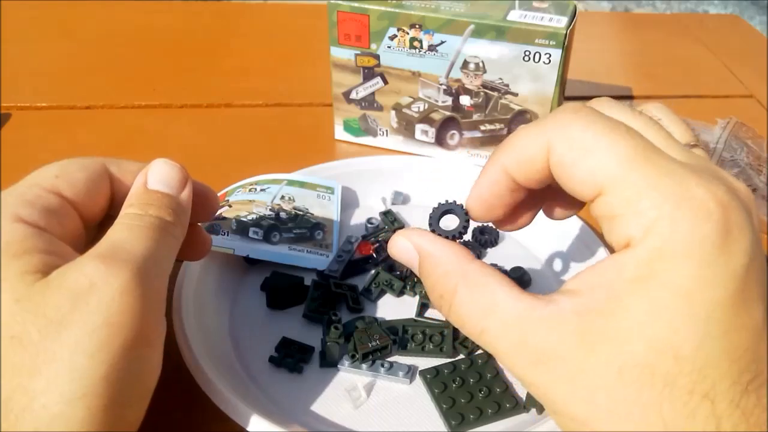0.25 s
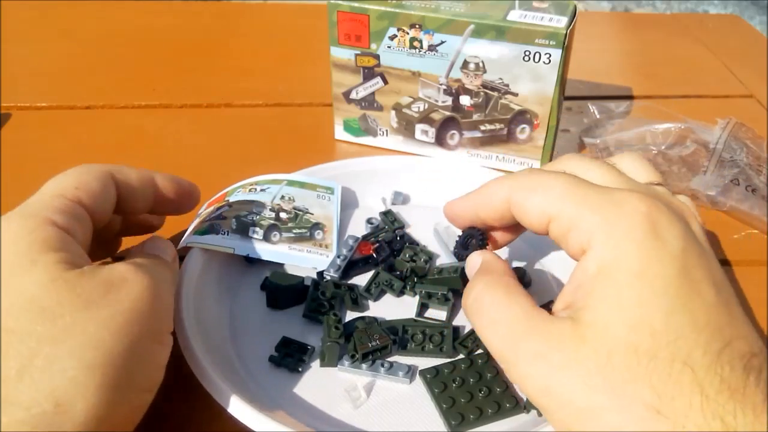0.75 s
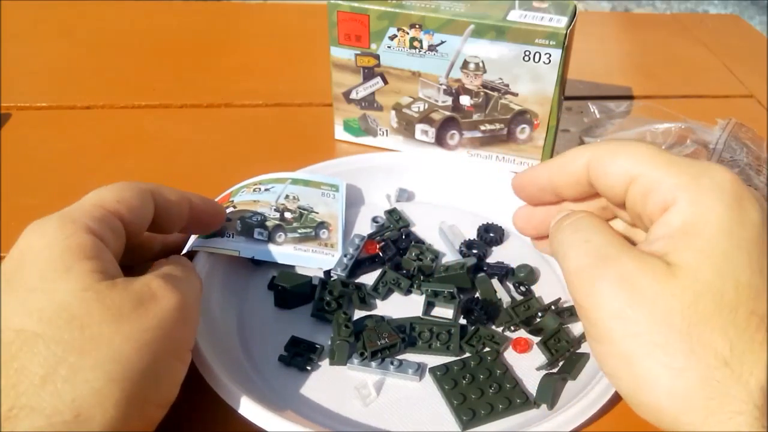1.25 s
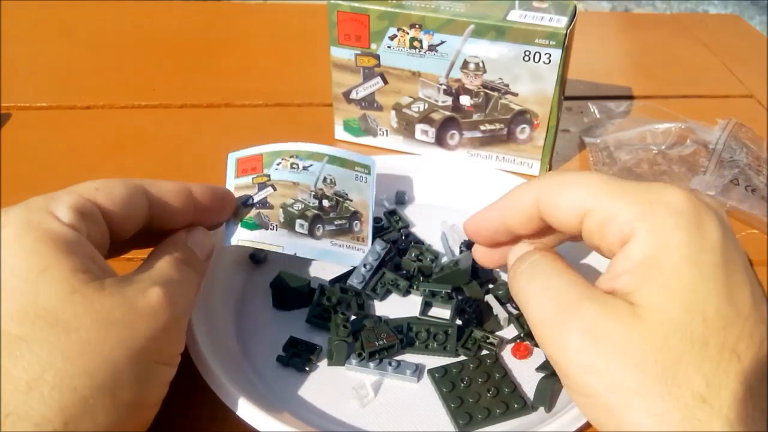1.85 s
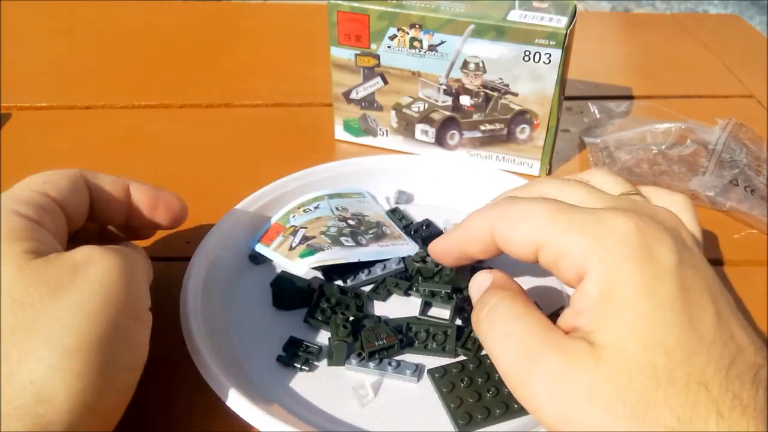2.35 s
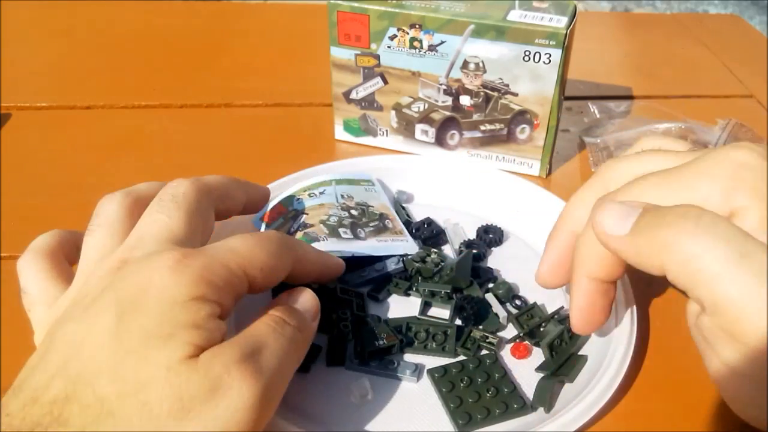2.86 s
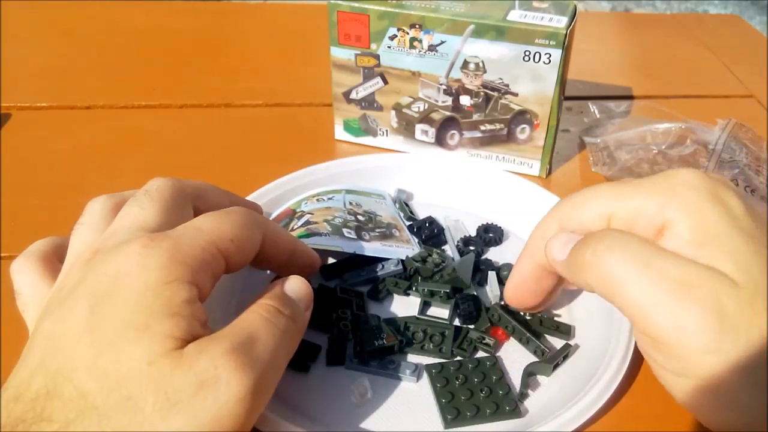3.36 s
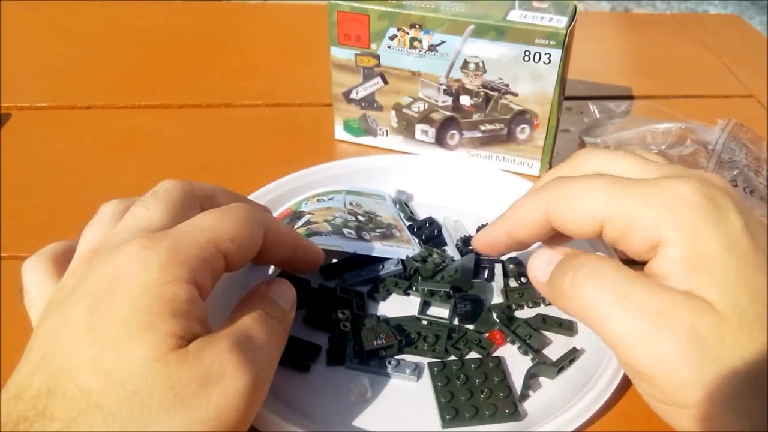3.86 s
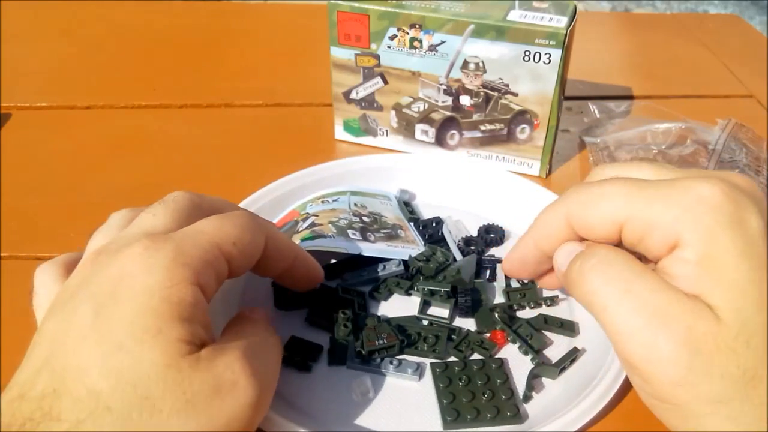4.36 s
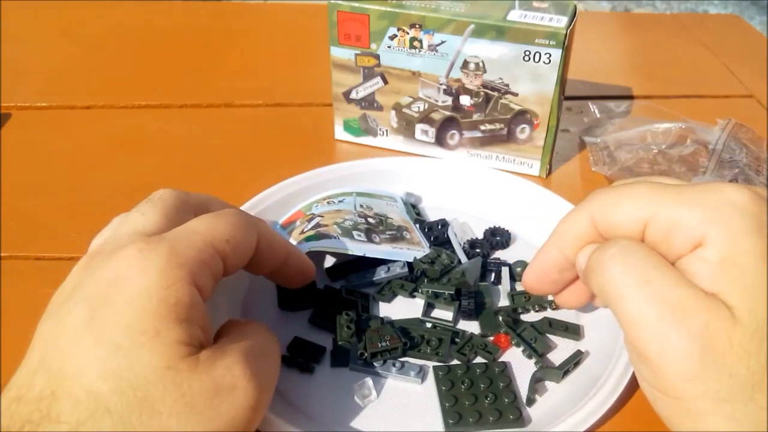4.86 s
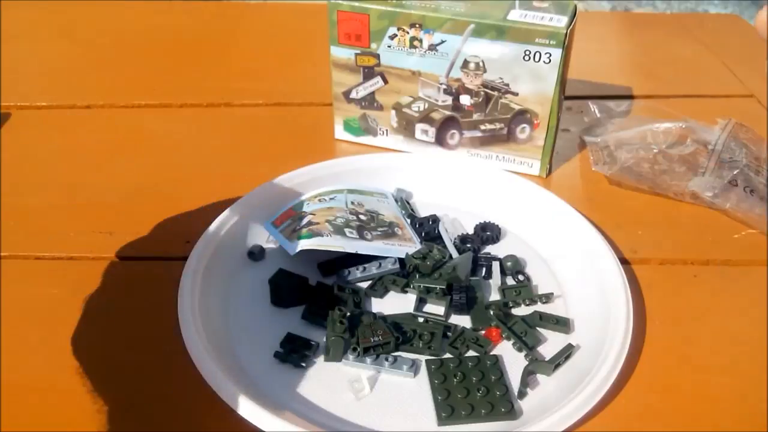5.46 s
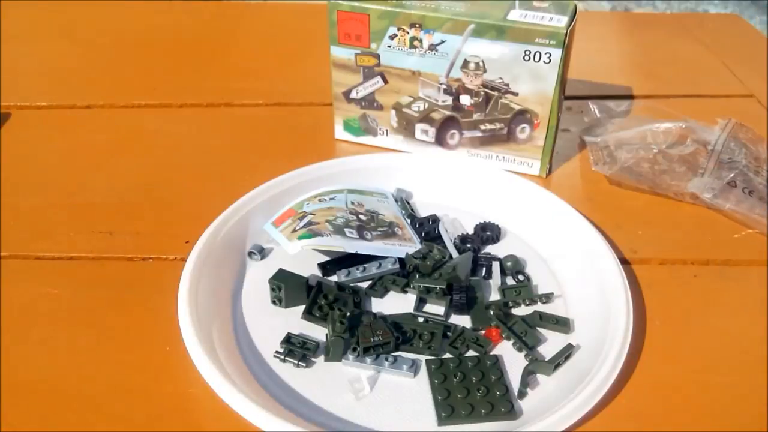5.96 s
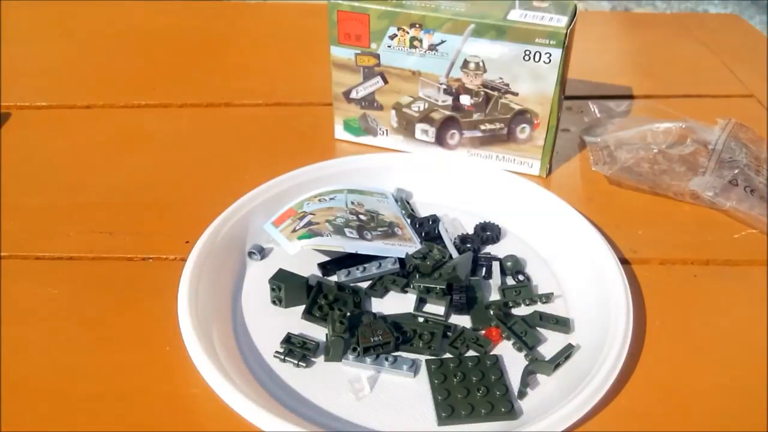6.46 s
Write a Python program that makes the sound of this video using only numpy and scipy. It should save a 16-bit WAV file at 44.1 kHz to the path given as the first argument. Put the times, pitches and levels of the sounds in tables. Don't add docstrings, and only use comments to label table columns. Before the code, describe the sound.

A faint steady hiss and soft, low knocks of wrists on a table fill the first second. At about 1.0 s fingers begin stirring small plastic bricks on a thin plastic plate: faint ticks, then a crisp rattle around 1.2 s. Lighter shuffling follows from 1.6 to 2.1 s, then a dense, bright clatter with sharp snaps from 2.2 to 2.5 s. After a near pause, rummaging resumes at 3.0 s, with strong bursts near 3.4, 3.6 and 3.8 to 3.95 s and tiny ringing pings. Smaller clicks come around 4.0 to 4.4 s, then only sparse, weak ticks until 5.5 s. At about 5.7 s there is a firmer low bump and a very faint, short scuff of the plate on wood. Low muffled knocks continue over the hiss to the end at about 6.7 s. Very close, dry, band-limited stereo sound.

```python
import sys
import numpy as np
from scipy import signal
from scipy.fft import rfft, irfft
from scipy.io import wavfile
from scipy.ndimage import uniform_filter1d

SR = 44100
rng = np.random.default_rng(int(sys.argv[2]) if len(sys.argv) > 2 else 0)


def materialize(psi):
    bounded = np.clip(np.atleast_2d(psi).T, -1, 1)
    quanta = np.round(bounded * 32767).astype(np.int16)
    wavfile.write(sys.argv[1], SR, quanta)


def gain_from_db(level_db):
    decades = np.asarray(level_db, float) / 20
    return 10 ** decades


N = 296352

# (frequency [Hz], level [dB per Hz])
HISS_COLOUR = [(12, -8.5), (20, -8), (27, -2), (202, -21), (240, -11), (340, -14.5), (447, -18), (853, -23),
               (919, -24), (2000, -23.5), (4190, -18.5), (6000, -21), (7600, -26), (9880, -77),
               (16700, -120)]
HISS_DB = -57.5
# (frequency [Hz], likeness [-1 to 1])
HISS_LIKENESS = [(60, .8), (160, 0.48), (430, 0.35), (1140, 0.17), (2500, 0.13), (4500, 0.59), (8130, 0.89)]
# (frequency [Hz], lead [rad])
HISS_LEFT_LEAD = [(130, 1.64), (220, 4.88), (420, 2.75), (1000, 3.1)]
# (time [s], low rumble [dB], hiss swell [dB])
UNREST_CURVE = [
    (0.0, -52, 2),
    (0.241, -58, 0.5),
    (2.02, -57.5, 1.5),
    (5.3, -56.5, 0.5),
    (6.4, -54, 2.5),
    (6.5, -53, 1.5),
    (6.72, -54, 1),
]

# (time [s], peak [dB], swing [Hz])
SINGLE_KNOCKS = [(0.129, -46, 89), (0.196, -43, 68.4), (0.463, -46.5, 107), (1.043, -39, 115),
                 (1.21, -42.5, 119), (1.26, -45, 96), (1.832, -38, 95), (2.008, -37, 90),
                 (2.035, -45.5, 95), (2.264, -54, 190), (2.328, -42, 132), (2.432, -36, 202),
                 (2.451, -45, 219), (2.949, -41, 146), (3.324, -34.5, 99.5), (3.343, -31, 144),
                 (4.329, -47, 96), (4.358, -38.5, 105), (4.465, -46.5, 89.5), (4.676, -34, 112),
                 (4.869, -45, 72), (5.197, -42.5, 116), (5.257, -46, 83.5), (5.38, -35, 104),
                 (5.625, -46, 84), (5.869, -43, 84), (6.009, -42.5, 83), (6.218, -33, 105),
                 (6.235, -34.5, 104), (6.419, -31, 112)]
# (time [s], peak [dB], swing [Hz], second contact relative [dB])
DOUBLE_KNOCKS = [(0.014, -36, 90, -21), (0.663, -39, 93, -21), (1.021, -47, 111, 9),
                 (1.979, -44.5, 89, 5.5), (2.913, -40.5, 107, -4.5), (2.962, -38, 111, -15),
                 (3.291, -45, 121, 5), (3.351, -35, 99, 0), (3.386, -37, 99, -23), (3.413, -39, 118, -12),
                 (4.053, -44, 115, -1), (4.189, -41.5, 90, -14), (4.235, -48, 145, 17),
                 (4.695, -39.5, 99, -23), (5.455, -45.5, 82.5, -3), (5.707, -44.5, 113, 8),
                 (5.736, -28.5, 123, -19), (5.849, -43.5, 100, -14), (6.255, -36, 106, -3.5),
                 (6.295, -32, 101, -16), (6.367, -37.5, 100, -12), (6.393, -45, 95, -20)]
BOUNCE_S, BOUNCE_SAG = 0.01285, 0.8
# (time [s], peak [dB])
SOFT_NUDGES = [(0.986, -54), (1.293, -48.5), (1.956, -46.5), (2.748, -51), (3.451, -48), (4.488, -52),
               (4.738, -50), (4.769, -51.5), (5.169, -49), (5.32, -50), (5.414, -48), (5.784, -51),
               (5.914, -46.5), (6.064, -55), (5.232, -50), (5.288, -53), (5.472, -46.5), (6.6, -53),
               (6.69, -54), (2.8, -56), (3.159, -51)]
NUDGE_HZ = 95

# (time [s], level [dB], relative plate flex [dB])
SLIDING_STIRS = [
    [(0.93, -81, 17.5), (1.18, -40, 10.5), (1.3, -73, -33)],
    [(1.54, -49.5, 16), (1.7, -43, 7), (1.796, -44, 2.5), (1.86, -60, 11)],
    [(1.87, -45, -14), (2.016, -55, 13.5), (2.08, -57, 3)],
    [(2.1, -59.5, 8), (2.366, -34, 4), (2.555, -71, 9.5)],
    [(3.0, -47, 8), (3.224, -54, 6), (3.24, -61, -9)],
    [(3.25, -35, 5), (3.47, -62, 0)],
    [(3.545, -42.5, 6), (3.67, -67, 2)],
    [(3.705, -48, -30), (3.791, -35.5, 8.5), (3.855, -53, -3)],
    [(3.89, -40, 12), (4.008, -66, -10), (4.08, -81, -18)],
    [(4.176, -45, 13), (4.46, -58, -11)],
    [(4.65, -59.5, 18.5), (4.886, -53, 1.5), (4.93, -76, 0)],
    [(5.0, -67, 0), (5.382, -53.5, -1), (5.6, -64, 16)],
]
# (peak time [s], level [dB], spread [ms], pitch [Hz])
TUMBLE_BURSTS = [(0.988, -53, 9, 3800), (1.039, -52.5, 28, 3780), (1.136, -31, 4.5, 4630),
                 (1.196, -30, 9.1, 4800), (1.246, -38, 7.5, 5150), (1.639, -31, 5.9, 4600),
                 (1.673, -33.5, 10, 4530), (1.748, -34.5, 4.5, 3960), (2.118, -45, 6.5, 5450),
                 (2.133, -40.5, 2.2, 5200), (2.189, -38, 3.4, 4960), (2.217, -36, 4.9, 5030),
                 (2.226, -33, 11, 4720), (2.249, -29.5, 3.1, 4970), (2.347, -24.5, 0.96, 4300),
                 (2.461, -28.5, 11, 4030), (3.154, -47, 12, 5220), (3.35, -31.5, 2, 4500),
                 (3.379, -23, 11.6, 4800), (3.408, -26.5, 7.6, 4940), (3.44, -30.5, 2, 4150),
                 (3.564, -40, 4.2, 4400), (3.606, -25.5, 4.1, 5060), (3.625, -36, 7, 4800),
                 (3.774, -21.5, 4.3, 4760), (3.908, -33.5, 2.5, 5580), (3.927, -30.5, 3.2, 4670),
                 (3.948, -34, 7.3, 4600), (4.296, -33, 5.8, 5050), (4.86, -43, 5.6, 3770)]
# (peak time [s], level [dB], die-away [ms], pitch [Hz])
SPILL_BURSTS = [(1.172, -28.5, 12, 4900), (1.234, -40, 9.2, 4460), (5.216, -52, 10, 4130),
                (1.588, -48, 31, 5400), (1.614, -44, 45, 5450), (1.929, -33.5, 1.7, 4600),
                (1.952, -48, 2.9, 4530), (1.995, -43, 3.2, 4970), (2.262, -24, 7.6, 4750),
                (2.433, -26.5, 6, 4160), (2.502, -33, 7.2, 4000), (3.01, -36, 17, 4600),
                (3.038, -31, 3.7, 4300), (3.25, -41, 1.2, 3960), (3.262, -40.5, 11, 4430),
                (3.359, -26.5, 8.5, 4600), (3.489, -44.5, 7.6, 4270), (3.654, -49, 2.3, 4800),
                (3.732, -34, 4.3, 4180), (3.894, -52, 5, 5100), (4.029, -36, 3.9, 5550),
                (4.179, -37.5, 6.6, 4330), (4.27, -44, 50, 4240), (4.77, -52, 49, 4600),
                (4.67, -62, 30, 3600), (4.9, -47.5, 1.7, 4400), (5.197, -48.5, 16, 3940),
                (5.24, -51, 27, 4540), (5.453, -49, 2.6, 5000)]
# (jam time [s], level [dB], build-up [ms], pitch [Hz])
SHOVE_BURSTS = [(1.224, -35, 8.2, 4760), (1.735, -36, 23, 5450), (1.808, -39, 11, 3820),
                (1.821, -35, 4.2, 4120), (1.852, -46.5, 49, 4420), (1.965, -39.5, 2.9, 4940),
                (2.034, -51, 6.5, 4780), (2.293, -33.5, 17, 4950), (2.32, -27.5, 15, 4260),
                (2.37, -31.5, 10, 4140), (2.388, -37, 6.8, 4680), (2.445, -26, 7.9, 4370),
                (2.748, -52.5, 18, 3930), (3.073, -38, 21, 3950), (3.208, -40.5, 8.4, 4450),
                (3.224, -39, 14, 4830), (3.285, -29.5, 7.4, 4400), (3.317, -38, 11, 4150),
                (3.593, -39.5, 13, 4600), (3.8, -34, 6.7, 4600), (3.965, -34, 6.7, 4460),
                (4.04, -39.5, 4.2, 4430), (4.057, -47, 8.1, 4600), (4.244, -42, 28, 4070),
                (4.361, -49.5, 52, 4800), (4.394, -43.5, 7.2, 4500), (5.037, -56.5, 46, 4430),
                (5.279, -49, 28, 4240), (5.364, -46, 31, 4530), (5.417, -41.5, 14, 4300)]
STRIKE_MS, JAM_MS, SWELL = 1.1, 3.7, 0.87

# (frequency [Hz], level [dB per Hz])
CLATTER_COLOUR = [(88, -38), (150, -4.5), (304, -3.5), (474, -21), (680, -15), (960, -11.5), (1450, -26),
                  (1680, -24), (1900, -5), (2150, -3), (2930, -7), (4140, -1.5), (5300, -1), (6200, -4.5),
                  (7120, -10.5), (7600, -30), (9880, -50), (16700, -120)]
# (frequency [Hz], level [dB], t60 [s])
BRICK_TONES = [(2195, 9.5, 0.016), (2860, 2, 0.091), (4430, -4, 0.05), (4600, -9, .025),
               (5800, -6.5, 0.041), (5700, -12.5, 0.06)]
# (frequency [Hz], t60 [s])
PLATE_T60 = [(200, 0.16), (1000, 0.1), (2200, 0.054), (5000, 0.033), (8000, 0.0055)]
# (frequency [Hz], likeness [-1 to 1])
TICK_LIKENESS = [(200, 1), (350, 0.77), (520, -0.64), (1000, 1), (2300, 0.91), (3500, 0.32), (7000, -0.75)]
TICKS_PER_S, TICK_SPREAD_DB, MODES_DB, HEAP_DB = 4000, 2, -12.5, -1.5
CRACK_DB, CRACK_T60 = 6, 0.0098

# (time [s], level [dB], pitch [Hz])
EARLY_SNAPS = [(0.9838, -52, 3810), (1.1046, -51, 4090), (1.137, -35.5, 4970), (1.2631, -41, 4480),
               (1.59, -39, 5420), (1.6512, -37, 5200), (1.677, -28, 4070), (1.685, -34, 4320),
               (1.7207, -39, 4370), (1.726, -41, 4200), (1.7474, -32, 3010), (1.8074, -41, 3900),
               (1.822, -36, 4220), (1.855, -44.5, 4360), (1.917, -42, 4250), (1.9285, -43, 4630),
               (1.9519, -47, 4510), (1.963, -37.5, 4460), (1.9673, -38, 4800), (1.9935, -48, 5140),
               (1.996, -48, 4480), (2.013, -46.5, 4330), (2.0364, -38.5, 4250), (2.0713, -46, 4660),
               (2.1174, -39, 5420), (2.133, -48, 4500), (2.191, -41, 4800), (2.2142, -35, 4300),
               (2.2255, -29, 4780), (2.2348, -32, 4870), (2.259, -20, 4590), (2.2663, -21, 5060),
               (2.2781, -21, 5110), (2.292, -27, 5350), (2.3006, -27, 4500), (2.315, -25.5, 4200),
               (2.3222, -41, 3450), (2.347, -28, 4580), (2.3604, -30, 4180), (2.3735, -28, 4520),
               (2.3887, -29, 4670), (2.3945, -33.5, 4500), (2.405, -38.0, 5110), (2.4438, -21.5, 4970),
               (2.5003, -30, 4300), (2.5117, -46, 3880), (2.5251, -36, 4430), (2.539, -41, 4670),
               (2.544, -51, 3450), (3.04, -55, 3660), (3.042, -31, 4530), (3.055, -38, 3020),
               (3.0958, -42, 4490), (3.154, -47, 4410), (3.1962, -38.5, 4220), (3.2259, -38, 3550)]
# (time [s], level [dB], pitch [Hz])
LATE_SNAPS = [(3.2493, -39, 3280), (3.2616, -27, 4060), (3.3468, -26.5, 3410), (3.35, -27, 4200),
              (3.357, -28, 3800), (3.3713, -30, 3880), (3.3793, -25, 4940), (3.394, -25, 2790),
              (3.4106, -23, 4600), (3.4393, -30, 3650), (3.4437, -30.5, 3140), (3.491, -45.5, 4070),
              (3.564, -32, 4340), (3.596, -29, 4200), (3.6034, -19, 4600), (3.656, -42, 4350),
              (3.732, -35, 4320), (3.765, -25.5, 4430), (3.773, -26, 4630), (3.776, -30, 4170),
              (3.7983, -31.5, 4440), (3.8941, -41, 5010), (3.9036, -27, 5270), (3.9076, -32, 5480),
              (3.9122, -35.5, 3690), (3.9189, -34, 4130), (3.926, -30.5, 4400), (3.9626, -40, 4680),
              (4.0308, -32.5, 4270), (4.041, -30.5, 4220), (4.0733, -52, 3960), (4.18, -44, 5190),
              (4.239, -47, 4740), (4.245, -42, 3900), (4.2695, -44, 4010), (4.2717, -44, 3920),
              (4.295, -28.5, 4100), (4.3808, -44, 4230), (4.3924, -40, 4580), (4.6824, -51, 2610),
              (4.8554, -51, 4200), (4.861, -45, 2630), (4.8991, -44, 4180), (5.023, -58.5, 3210),
              (5.039, -49, 4270), (5.197, -45, 3320), (5.214, -50, 3260), (5.236, -45, 3200),
              (5.2883, -43, 3760), (5.3066, -51, 4010), (5.342, -42, 4160), (5.363, -44, 4020),
              (5.3924, -55, 4640), (5.4185, -35.5, 2420), (5.502, -47.5, 4510)]
SNAP_RISE_MS, SNAP_FALL_MS, SNAP_LAG_US = 0.52, 0.83, 51
SNAP_DB, SNAP_EDGE = 2, 0.48

# (start [s], length [s], level [dB], pitch [Hz])
BRICK_SQUEAKS = [
    (0.995, .055, -59, 2680),
    (1.056, .028, -57, 4100),
    (3.96, .05, -66, 1590),
    (3.968, .085, -68, 1350),
    (4.668, .02, -63, 2600),
    (5.449, .018, -52, 5300),
]
# (time [s], peak [dB], pitch [Hz])
BRICK_PINGS = [(1.156, -54, 6000), (1.191, -38, 5500), (1.193, -33, 7040), (1.2, -29, 4200),
               (1.216, -38, 6900), (1.235, -43, 2105), (1.581, -42, 5430), (1.605, -38, 5470),
               (2.038, -48, 4920), (2.113, -43, 5660), (2.209, -44, 2630), (2.262, -27, 5100),
               (2.29, -31, 5600), (2.44, -27.5, 2195), (2.473, -28.5, 2080), (3.384, -24, 4270),
               (3.415, -35, 2130), (3.833, -44, 3840), (3.9, -32, 5330), (3.935, -48, 2320),
               (4.028, -53.5, 717), (4.031, -38, 6130), (4.039, -50, 2260), (4.056, -47, 7030),
               (4.072, -54, 4080), (4.181, -52, 904), (4.21, -44, 2290), (4.296, -34, 5500),
               (4.312, -43, 2160), (4.344, -51, 4000), (4.575, -57, 5200), (4.86, -48, 6400),
               (4.898, -50, 4400), (5.035, -51, 5420), (5.036, -54.5, 2250), (5.414, -38, 2630)]
# (time [s], peak [dB], pitch [Hz])
PLATE_THUDS = [
    (1.255, -50.5, 330),
    (1.626, -44.5, 300),
    (1.665, -46, 310),
    (3.775, -42, 280),
    (4.2, -42, 278),
    (5.745, -48.5, 340),
]
# (time [s], level [dB])
FOOT_SCUFF = [
    (5.621, -70),
    (5.68, -68),
    (5.715, -61),
    (5.75, -60),
    (5.771, -56.5),
    (5.795, -67.5),
    (5.89, -70.5),
    (5.9, -82),
]


def evened(x):
    return x / np.sqrt(np.mean(x ** 2) + 1e-20)


def read(points, hz):
    f, value = np.transpose(points)
    return np.interp(np.log(hz + 1), np.log(f + 1), value)


def filtered(x, order, hz, kind="low"):
    return signal.sosfilt(signal.butter(order, hz, kind, fs=SR, output="sos"), x)


def pair(frames, hz, alike):
    a, b, c, d = rng.standard_normal((frames, len(hz), 4)).T
    same = np.clip(read(alike, hz), -1, 1)[:, None]
    left = a + 1j * b
    right = same * left + np.sqrt(1 - same ** 2) * (c + 1j * d)
    return np.array([left, right])


def resonate(x, hz, width):
    turn = np.exp(2j * np.pi * np.cumsum(hz) / SR)
    r = np.exp(-np.pi * width / SR)
    return 2 * (turn * signal.lfilter([1 - r], [1, -r], x / turn)).real


def background():
    frames, hz = N // 256 + 5, np.fft.rfftfreq(1024, 1 / SR)
    s, rumble_db, swell_db = np.transpose(UNREST_CURVE)
    t = np.arange(frames) * 256 / SR
    patches = uniform_filter1d(rng.standard_normal((frames, 513)), 10, 0)
    patches_db = 1.4 * evened(uniform_filter1d(patches, 14, 1)).T
    level_db = read(HISS_COLOUR, hz)[:, None] + patches_db + np.interp(t, s, swell_db)
    z = pair(frames, hz, HISS_LIKENESS) * gain_from_db(level_db)
    port = np.array([0, 1])[:, None, None]
    z = z * np.exp(-1j * read(HISS_LEFT_LEAD, hz)[:, None] * port)
    hiss = gain_from_db(HISS_DB) * evened(signal.istft(z, nperseg=1024, noverlap=768)[1][:, :N])

    lumps = gain_from_db(3.66 * evened(uniform_filter1d(rng.standard_normal(N), 1500)))
    shake = rng.standard_normal((2, N)) * lumps
    quarter = irfft(-1j * rfft(shake[0]), N)
    rumble = filtered([shake[0], quarter + 0.6 * shake[1]], 2, [35, 150], "band")
    return hiss + evened(rumble) * gain_from_db(np.interp(np.arange(N) / SR, s, rumble_db) - 6.5)


def contacts():
    nudges = [(s, db, NUDGE_HZ) for s, db in SOFT_NUDGES]
    first = [(s, db, hz) for s, db, hz, _ in DOUBLE_KNOCKS]
    second = [(s + BOUNCE_S, db + more, hz * BOUNCE_SAG) for s, db, hz, more in DOUBLE_KNOCKS]
    return list(SINGLE_KNOCKS) + nudges + first + second


def knocks():
    out = np.zeros(N + 4000)
    for s, db, hz in contacts():
        u = np.arange(-1000, 2000) / SR * hz
        shape = np.where(u < 0, np.exp(-(u / 0.32) ** 2), np.exp(-abs(u / 0.96) ** 1.76))
        at = round(s * SR)
        swing = np.cos(2 * np.pi * u * (1 - 0.19 * u))
        out[at:at + 3000] -= gain_from_db(db + 3.0) * shape * swing
    out = out[1000:N + 1000]
    lows = filtered(out, 1, 45)
    return out * gain_from_db([[-.7], [.7]]) + lows * np.array([[-.3], [.3]])


def bursts():
    tumbles = [(s, db, SWELL * ms, ms, hz) for s, db, ms, hz in TUMBLE_BURSTS]
    spills = [(s, db, STRIKE_MS, ms, hz) for s, db, ms, hz in SPILL_BURSTS]
    shoves = [(s, db, ms, JAM_MS, hz) for s, db, ms, hz in SHOVE_BURSTS]
    return tumbles + spills + shoves


def hand():
    t = np.arange(N) / SR
    power, flex_db = np.full(N, 1e-12), np.zeros(N)
    for rows in SLIDING_STIRS:
        s, db, flex = np.transpose(rows)
        inside = (t > s[0]) & (t < s[-1])
        fade_in = np.clip((t - s[0]) / 0.017, 0, 1)
        power += inside * fade_in * gain_from_db(np.interp(t, s, db) - 1.0) ** 2
        flex_db += inside * np.interp(t, s, flex)
    pitch = power * 4500
    ms = np.arange(-2000, 3000) / SR * 1000
    for s, db, rise, fall, hz in bursts():
        at = round((s - .0015) * SR) - 2000
        shape = np.where(ms < 0, (abs(ms) / (0.65 * rise)) ** 1.12, (abs(ms) / fall) ** 0.94)
        burst = gain_from_db(db + 3.0) ** 2 * np.exp(-shape)
        power[at:at + 5000] += burst
        pitch[at:at + 5000] += burst * hz
    return np.sqrt(power), pitch / power, flex_db


def plate_ring():
    hz, t = np.fft.rfftfreq(512, 1 / SR), np.arange(3072) / SR
    z = pair(28, hz, TICK_LIKENESS) * gain_from_db(read(CLATTER_COLOUR, hz))[:, None]
    clatter = rfft(signal.istft(z, nperseg=512, noverlap=384)[1][:, :len(t)])
    centres, bins = np.geomspace(100, 9000, 9), np.fft.rfftfreq(len(t), 1 / SR)
    crack = gain_from_db(CRACK_DB - 60 * t / CRACK_T60)
    ring = 0
    for k, centre in enumerate(centres):
        share = np.interp(np.log(bins + 1), np.log(centres), np.arange(len(centres)) == k)
        t60 = max(read(PLATE_T60, centre), .004)
        ring = ring + irfft(clatter * share, len(t)) * (gain_from_db(-60 * t / t60) + crack) / np.sqrt(t60)
    tones = 0
    for f, db, t60 in BRICK_TONES:
        decay = gain_from_db(db + rng.normal(0, 6.0) - 60 * t / t60)
        cycles = f * rng.normal(1, 0.055) * t + rng.random((2, 1)) * 0.75
        tones = tones + decay * np.sin(2 * np.pi * cycles)
    ring = ring / np.linalg.norm(ring) + gain_from_db(MODES_DB) * tones / np.linalg.norm(tones)
    ring = ring * np.minimum(t / 0.00034, 1)
    return ring * np.sqrt(2) / np.linalg.norm(ring)


def bricks():
    force, pitch_hz, flex_db = hand()
    size = gain_from_db(TICK_SPREAD_DB * np.minimum(rng.exponential(1, N), 4))
    size *= rng.random(N) < TICKS_PER_S / SR
    size *= rng.choice([-1, 1], N)
    size /= np.sqrt(uniform_filter1d(size ** 2, 250) + 0.024)
    place = np.repeat(rng.integers(0, 14, N // 700 + 1), 700)[:N]
    spot = (place + rng.integers(0, 3, N)) % 14
    out = np.zeros((2, N))
    for k in range(14):
        ticks = size * force * (spot == k)
        out += signal.oaconvolve(ticks[None], plate_ring())[:, :N]
    low = filtered(out, 4, 440)
    dull = filtered(out, 2, 3400)
    tilt = np.clip((pitch_hz - 4500) / 1600, -.9, .9)
    flexing = low * gain_from_db(flex_db + np.array([[-1.4], [1.4]]))
    body = (out - dull) * (1 + .5 * tilt) + (dull - low) * (1 - tilt) + flexing
    rim = resonate(out, np.full(N, 2200.), 260)
    body = body - 0.35 * resonate(body, np.full(N, 1560.), 420)
    return 0.77 * body + 0.32 * resonate(out, pitch_hz, 1500) + 0.068 * rim


def snaps():
    out, rows = np.zeros((2, N)), list(EARLY_SNAPS) + list(LATE_SNAPS)
    ms = np.arange(-100, 300) / SR * 1000
    grit = filtered(rng.standard_normal((len(rows), 2, 400)), 2, [1900, 7000], "band")
    late = ms - np.array([[0], [SNAP_LAG_US / 1000]])
    shape = np.exp(-np.where(late < 0, (late / SNAP_RISE_MS) ** 2, abs(late / SNAP_FALL_MS)))
    for (s, db, hz), edge in zip(rows, grit):
        rough = edge[:1] + 0.84 * edge
        tone = np.cos(2 * np.pi * hz * late / 1000) + SNAP_EDGE * rough
        out[:, round(s * SR) - 100:][:, :400] += gain_from_db(db + SNAP_DB) * shape * tone
    return filtered(out, 5, [1950, 6900], "band")


def squeaks():
    out = np.zeros(N)
    for s, length, db, hz in BRICK_SQUEAKS:
        t = np.arange(0, length, 1 / SR)
        waver = 1 + .006 * np.sin(2 * np.pi * (45 * t + rng.random()))
        swell = np.sin(np.pi * t / length) ** 0.51
        tone = np.sin(2 * np.pi * np.cumsum(hz * waver) / SR)
        out[round(s * SR):][:len(t)] += gain_from_db(db) * swell * tone
    return out


def pings():
    out, t = np.zeros((2, N)), np.arange(6000) / SR
    rows = list(BRICK_PINGS) + list(PLATE_THUDS)
    for s, db, hz in rows:
        step = rng.uniform(0, 1.0) * hz / 5000
        tone = np.sin(2 * np.pi * hz * t + np.array([[0], [step]])) * np.minimum(t / 0.0019, 1)
        t60 = 0.045 * (4000 / hz) ** 0.22
        out[:, round(s * SR):][:, :len(t)] += gain_from_db(db - 0.5 - 60 * t / t60) * tone
    return out


def scuff():
    s, db = np.transpose(FOOT_SCUFF)
    lumps = gain_from_db(1.6 * evened(uniform_filter1d(rng.standard_normal(N), 150)))
    grain = rng.standard_normal((2, N)) * lumps
    grain = grain[:1] + 0.54 * grain
    rub = filtered(grain, 2, [450, 1800], "band")
    rasp = filtered(grain, 3, [2200, 5600], "band")
    return (evened(rub) + 1.43 * evened(rasp)) * gain_from_db(np.interp(np.arange(N) / SR, s, db, -120, -120))


def scene():
    heap = gain_from_db(HEAP_DB) * bricks() + snaps() + pings() + squeaks()
    return background() + knocks() + heap * gain_from_db([[1.0], [-1.0]]) + scuff()


def top_cut(x):
    return signal.sosfilt(signal.butter(12, 8730, fs=SR, output="sos"), x)


def record(dry):
    edge = signal.firwin(121, 7950, window=("kaiser", 6.0), fs=SR)
    mix = signal.oaconvolve(dry, edge[None], "same") - .0011
    return top_cut(mix)


dry = scene()
out = record(dry)
materialize(out)
```